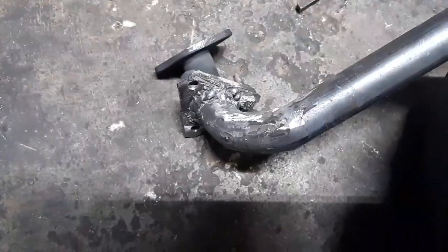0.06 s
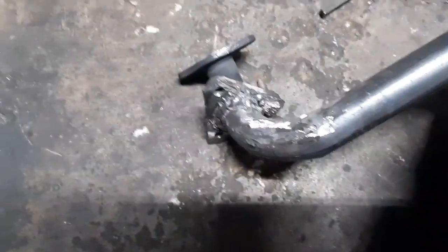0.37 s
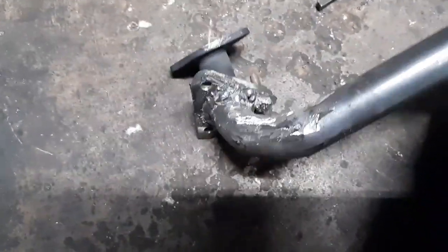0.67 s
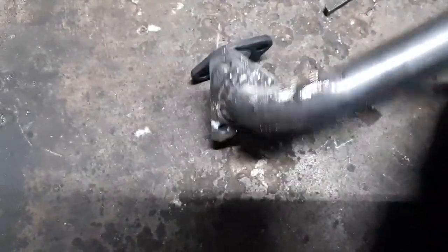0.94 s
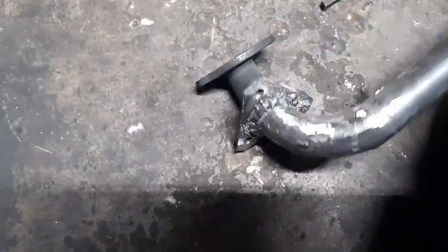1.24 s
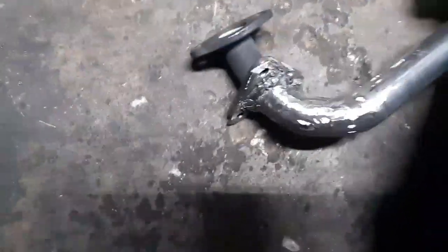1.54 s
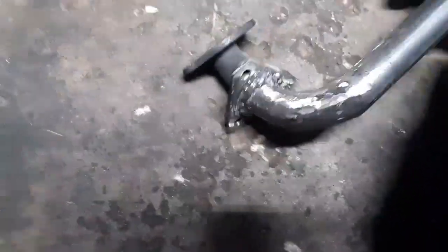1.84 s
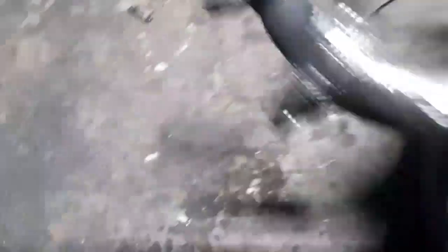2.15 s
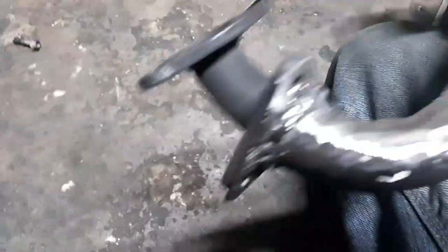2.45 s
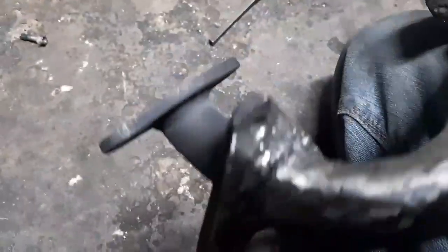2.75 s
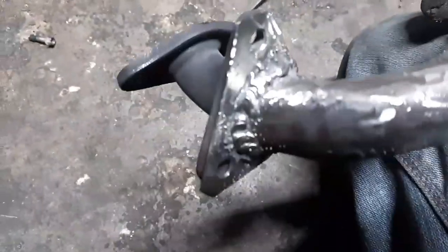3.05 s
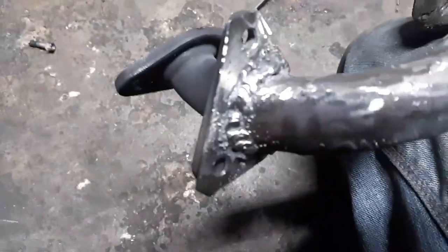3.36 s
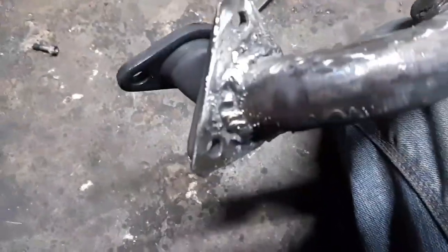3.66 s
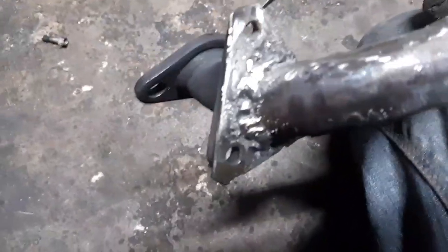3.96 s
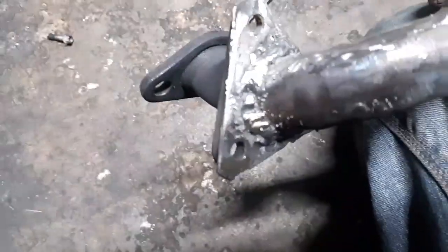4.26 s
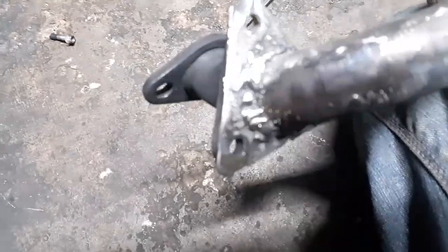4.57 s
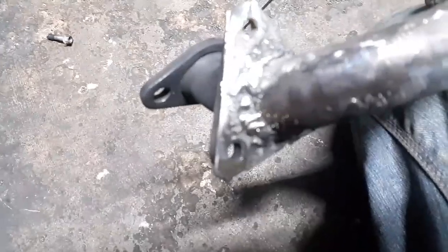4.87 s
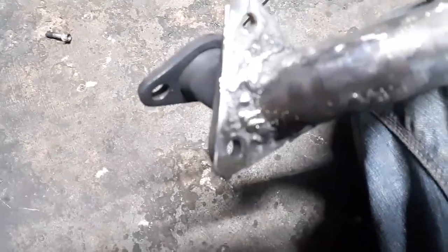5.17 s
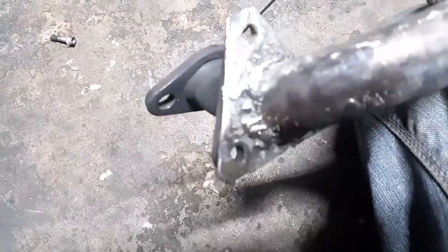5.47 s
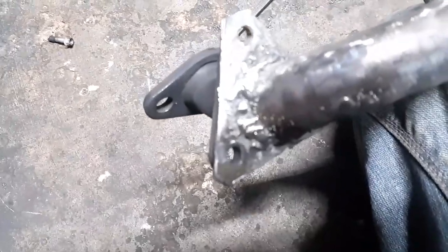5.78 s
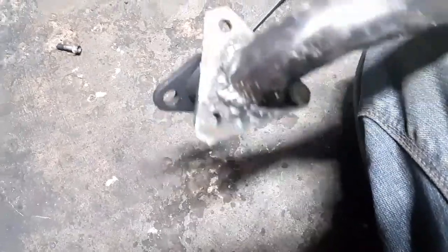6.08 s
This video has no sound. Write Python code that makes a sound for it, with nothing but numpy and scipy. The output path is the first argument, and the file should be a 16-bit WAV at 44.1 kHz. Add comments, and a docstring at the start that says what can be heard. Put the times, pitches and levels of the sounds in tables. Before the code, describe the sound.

A steel exhaust pipe is turned over on a concrete garage floor, close to a small microphone. It taps lightly, then gives a sharp ringing clank, a second clank and a brief squealing skid with a dull thud. Soft rubbing and one more clink follow as it is lifted. A low fan-like hum with thin hiss runs underneath and carries on afterwards, broken by one tiny tick.

```python
"""A fan-like hum and thin hiss fill a garage. Close to a small microphone, a welded steel exhaust pipe is
turned over on the concrete floor: its flanges tap, clank, skid briefly and clink once more as it is lifted.
Every contact rings the same modes, favouring two of them; a skid adds a squeal. The pipe rubs softly as it
shifts, a faint high haze follows the last clink, one tiny tick comes later, and the walls answer faintly."""
import sys
import numpy as np
from scipy import signal
from scipy.fft import rfft, irfft, next_fast_len
from scipy.io import wavfile
from scipy.ndimage import map_coordinates

SR = 44100
rng = np.random.default_rng(int(sys.argv[2]) if len(sys.argv) > 2 else 0)


def persist_wave(psi):
    """Save psi, clipped to +-1, as 16-bit WAV."""
    counts = np.round(np.clip(psi, -1, 1) * 32767).astype(np.int16)
    wavfile.write(sys.argv[1], SR, np.atleast_2d(counts).T)


N = 269878


def amp(db):
    """Decibels to gain."""
    return 10 ** (np.asarray(db) / 20)


def unit(x):
    """x at rms 1."""
    return x / np.sqrt(np.mean(x ** 2) + 1e-20)


def along(points, hz):
    """(frequency, value) points read on a log axis."""
    freqs, values = np.transpose(points)
    return np.interp(np.log(hz + 1), np.log(freqs + 1), values)


def wobble(rate, size=N):
    """A smooth random curve, rate knots a second."""
    knots = rng.standard_normal(int(size * rate / SR) + 4)
    return map_coordinates(knots, [np.arange(size) * rate / SR])


def filtered(x, response):
    """x shaped by a gain that depends on frequency."""
    size = next_fast_len(len(x) + 8192)
    return irfft(rfft(x, size) * response(np.fft.rfftfreq(size, 1 / SR)), size)[:len(x)]


def noise(colour):
    """Noise of rms 1 with a (frequency [Hz], level [dB]) spectrum."""
    return unit(filtered(rng.standard_normal(N), lambda hz: amp(along(colour, hz))))


def dying(x, t60s, hold_s=0):
    """x dies away after hold_s, each frequency at its own speed."""
    hz, t, spectrum = signal.stft(x, SR, nperseg=256)
    fade = amp(-60 * np.maximum(t - hold_s, 0) / along(t60s, hz)[:, None])
    return signal.istft(spectrum * fade, SR, nperseg=256)[1][:len(x)]


def add(track, start_s, sound):
    """Mix a sound into the track."""
    part = track[round(start_s * SR):][:len(sound)]
    part += sound[:len(part)]


# rise and fall of the room tone: (time [s], level [dB])
ROOM_TONE_LEVEL = [(0, -58), (0.32, -58.5), (0.52, -52.5), (1.42, -52), (1.75, -61), (2.05, -67.5),
                   (2.28, -66.5), (2.39, -57.5), (2.6, -53.5), (6.12, -53)]
# tones in the hum: (frequency [Hz], relative level [dB])
HUM_TONES = [(122, -21), (163, -16.5), (204, -16.5), (247, -10), (362, -15.5), (1102, -18.5)]
# spectra of the low hum, the moving air and the hiss: (frequency [Hz], relative level [dB])
HUM_SPECTRUM = [(20, -26), (40, -20.5), (65, -15), (100, -10.5), (160, -2), (240, -2), (300, -7), (430, -6),
                (500, -21), (620, -25.5), (900, -60.5)]
AIRFLOW_SPECTRUM = [(350, -40.5), (560, -14.5), (700, -6), (880, 2.5), (1030, -3), (1150, -4.5),
                    (1280, -11.5), (1490, -4), (1700, -18.5), (1950, -24.5), (2130, -15.5), (2320, -23.5),
                    (2500, -11), (2850, -17), (3150, -28), (4500, -61.5)]
HISS_SPECTRUM = [(400, -27), (1500, -2.5), (3200, -7), (4300, -3.5), (4950, -1.5), (5600, 0), (6850, -5),
                 (7200, -14.5), (9500, -14), (12000, -10.5), (16000, -12.5)]


def room_tone(hum_db=-2.5, airflow_db=-12, hiss_db=-24, hiss_follow=0.79, dulling=0.72, drift_rad=0.3434):
    """All around the microphone: hum, wavering tones, airflow and hiss, sinking after the clanks a while."""
    t = np.arange(N) / SR
    level_db = np.interp(t, *np.transpose(ROOM_TONE_LEVEL))
    usual_db = np.median(level_db)
    change_db = level_db - usual_db
    tones = sum(amp(db) * np.sqrt(2) * np.sin(2 * np.pi * hz * t + drift_rad * wobble(11))
                for hz, db in HUM_TONES)
    # the airflow grows duller as it sinks
    airflow = noise(AIRFLOW_SPECTRUM)
    dull = filtered(airflow, lambda hz: 1 / (1 + (hz / 1800) ** 12))
    airflow = dull + amp(dulling * change_db) * (airflow - dull)
    hum = amp(hum_db) * noise(HUM_SPECTRUM) + amp(airflow_db) * airflow + tones
    # the hiss sinks less than the hum
    hiss = amp(hiss_db + usual_db + hiss_follow * change_db) * noise(HISS_SPECTRUM)
    return amp(level_db - 2) * hum + hiss


# reverberation of the garage: (frequency [Hz], t60 [s])
GARAGE_DECAY = [(150, .28), (1000, 0.35), (6000, 0.26), (14000, 0.05)]


def garage(x):
    """The short diffuse answer of the walls, reaching the microphone 10 ms after the direct sound."""
    tail = np.pad(dying(rng.standard_normal(SR // 2), GARAGE_DECAY), (SR // 100, 0))
    return signal.fftconvolve(x, tail / np.linalg.norm(tail))[:N]


# one small dry tick: (time [s], level [dB], t60 [s])
TICK_EVENT = (4.2003, -49.5, 0.015)
# its spectrum: (frequency [Hz], relative level [dB])
TICK_SPECTRUM = [(600, -17), (1700, -2), (4000, 1), (6000, 2), (7500, -15), (10500, -17), (15000, -29)]


def tick(tail_db=-15, tail_t60=0.16):
    """A tiny click close by while the pipe is held still, scattered briefly by nearby surfaces."""
    start_s, db, t60 = TICK_EVENT
    t = np.arange(N) / SR - start_s
    fade = amp(-60 * np.abs(t) / t60) + amp(tail_db - 60 * np.abs(t) / tail_t60)
    return (t > 0) * amp(db) * fade * noise(TICK_SPECTRUM)


# soft rubs and, at 1.983 s, a faint, brief high haze just after the last clink:
# (middle time [s], half length [s], level [dB])
SWISHES = [(0.4, 0.076, -77.5), (0.508, 0.036, -66.5), (0.71, 0.035, -66.5), (1.217, 0.084, -66.5),
           (1.24, 0.02, -60), (1.439, 0.085, -54), (1.71, 0.011, -64), (1.779, 0.059, -64),
           (1.983, 0.04, -71), (5.974, 0.031, -71.5), (6.04, .035, -72.5)]
# their spectrum: (frequency [Hz], relative level [dB])
SWISH_SPECTRUM = [(200, -29.5), (700, 5), (1800, -7), (4000, -2), (6400, -2.5), (7800, -10), (12000, -8.5),
                  (16000, -7)]


def swishes(grain_db=1.5, sing_db=-7, note_hz=6465, second_hz=6170, slip_s=0.001):
    """Short grainy swishes close by, mostly the pipe rubbing as it shifts; the steel sings faintly along."""
    t = np.arange(N) / SR
    swell = sum(amp(db) * np.exp(-((t - middle_s) / half_s) ** 2) for middle_s, half_s, db in SWISHES)
    swish = swell * unit(noise(SWISH_SPECTRUM) * amp(grain_db * wobble(500)))
    # the hand that rubs also damps the ring
    steel = ring(t[:SR // 4], note_hz, second_hz, slip_s, damping=4)
    singing = signal.fftconvolve(swish, steel / np.linalg.norm(steel))[:N]
    return swish + amp(sing_db) * singing


def squeal(hz, skid_s, centre_hz=8460, width_octaves=0.48, build_s=0.0014):
    """A skid drives one treble band, harder the longer it lasts: 0-1 at each frequency."""
    band = np.exp(-(np.log2((hz + 1) / centre_hz) / width_octaves) ** 2)
    return (1 - np.exp(-skid_s / build_s)) * band


def thud(t, low_burst, thud_db, t60=0.07, deepest_hz=44.7, lightest_hz=260, db_per_octave=8.5):
    """The low part of an impact on the floor: a heavier blow reaches deeper into the bass."""
    cutoff_hz = min(deepest_hz * 2 ** (-thud_db / db_per_octave), lightest_hz)
    return filtered(low_burst, lambda hz: hz ** 2 / (hz ** 2 + cutoff_hz ** 2)) * amp(-60 * t / t60)


# spectrum common to all clacks: (frequency [Hz], relative level [dB])
CLACK_SPECTRUM = [(30, -21.5), (70, -8.5), (125, 6), (185, 2), (290, -5), (400, 2), (540, -4.5), (900, 1.5),
                  (1550, -1), (1900, -5), (2500, 0), (3200, 1.5), (3800, 7), (5100, -6.5), (6100, 1),
                  (7700, -17), (9000, -12), (12500, -2), (15500, -3.5)]
# decay of a clack: (frequency [Hz], t60 [s])
CLACK_DECAY = [(150, 0.056), (1000, 0.064), (4000, 0.082), (7000, 0.066), (14000, .08)]


def clack(t, skid_s, hold_s, clack_db, tilt_db, thud_db, squeal_db=12.5, grit_db=3.5, ripple_db=6,
          thud_hz=200, bright_hz=1100, pivot_hz=3200):
    """Steel on concrete: a dense, gritty, quickly dying burst, brighter from a sharp edge, over a thud."""
    def response(hz):
        octaves = np.log2(np.maximum(hz, bright_hz) / pivot_hz)
        bright_db = clack_db + tilt_db * octaves + squeal_db * squeal(hz, skid_s)
        thud_share = along([(thud_hz, 1), (bright_hz, 0)], hz)
        colour_db = along(CLACK_SPECTRUM, hz) + thud_share * thud_db + (1 - thud_share) * bright_db
        # countless short-lived resonances, some 130 Hz apart, ripple the spectrum
        ripple = map_coordinates(rng.standard_normal(SR // 260 + 4), [hz / 130])
        return amp(colour_db + ripple_db * ripple * np.minimum(hz / 2000, 1))

    burst = filtered(rng.standard_normal(len(t)), response)
    low = filtered(burst, lambda hz: 1 / (1 + (hz / 500) ** 4))
    grit = amp(grit_db * wobble(700, size=len(t)))
    # only the first impact thuds; the skid sustains the bright part alone
    return dying(burst - low, CLACK_DECAY, hold_s) * grit + thud(t, low, thud_db)


# modes of the steel pipe: (frequency [Hz], relative level [dB], t60 before damping and late fade [s])
PIPE_MODES = [(858, -11, .12), (1029.6, -14, .16), (1420, -15, .14), (1630, -15, .14), (2273, -18.5, 0.11),
              (2694, -17.5, 0.15), (3100, -21, 0.099), (3597, -11, 0.12), (3780, -16, 0.075),
              (4573, -18, .15), (4684, -25, .36), (5780, -16.5, 0.24), (5943, -17.5, 0.27),
              (6170, -19.5, .14), (6465, -21.5, 0.16), (6656, -19, 0.15), (6703, -30.5, .17),
              (6962, -21.5, .21), (7226, -34, 0.26), (7487, -33.5, .18), (7938, -31.5, .14),
              (8130, -32, 0.099), (9099, -38.5, .15), (10214, -27, .1), (10830, -29.5, .21),
              (11450, -24, 0.12), (12006, -19.5, 0.13), (12134, -24, .14), (12600, -21.5, .1),
              (13400, -23.5, .07)]


def ring(t, note_hz, second_hz, skid_s, damping, hold_s=0, note_db=17, second_db=13, squeal_db=33,
         waver_rad=0.24, twin_db=-9, split_hz=38, late_fade_s=0.0546):
    """The pipe's modes hold while the flange is down, then fade; the loose contact makes them waver."""
    mode_hz, mode_db, mode_t60 = np.transpose(PIPE_MODES)
    # the point that touches favours two modes, and a skid lifts those in its band
    nearest = lambda hz: np.arange(len(mode_hz)) == np.argmin(np.abs(mode_hz - hz))
    driven_db = mode_db + note_db * nearest(note_hz) + second_db * nearest(second_hz)
    driven_db += squeal_db * squeal(mode_hz, skid_s)
    out = np.zeros(len(t))
    free_s = np.maximum(t - hold_s, 0)
    for hz, db, t60 in zip(mode_hz, driven_db, mode_t60):
        phase = 2 * np.pi * (hz * t + rng.random()) + waver_rad * wobble(220, size=len(t))
        # the tube is not quite round: each mode beats against a weaker twin
        twin = phase + 2 * np.pi * (split_hz * rng.standard_normal() * t + rng.random())
        out += amp(db - 60 * damping * free_s / t60) * (np.sin(phase) + amp(twin_db) * np.sin(twin))
    # the late ring fades faster and faster
    return out * amp(-(free_s / late_fade_s) ** 2)


# flanges meeting the floor: (time [s], skid length [s], damping by floor and grip [x decay speed],
# ring gain [dB], main note [Hz], second note [Hz], clack gain [dB], clack tilt [dB/octave], thud gain [dB])
FLOOR_CONTACTS = [(0.716, 0.00023, 2.1, -28.5, 4573, 5780, -28.5, -2.5, -26),
                  (0.730, 0.00017, 1.5, -40, 6465, 2694, -38.5, -2.5, -28),
                  (0.942, 0.0011, 1, -54, 4573, 10830, -54, -7.5, -34.5),
                  (0.962, 0.00054, 0.77, -54, 6465, 11450, -56, -8.5, -31),
                  (0.993, 0.0001, 1.4, -55.5, 6465, 11450, -59.5, -9.5, -23),
                  (1.03, 0.00091, 1.7, -62, 10830, 11450, -74, 4, -57),
                  (1.3407, 0.000066, 1.37, -18, 6170, 12134, -17.5, 1, -13.5),
                  (1.47, 0, 1.29, -21.5, 3597, 5943, -26.5, -4.5, -39.5),
                  (1.524, .018, 1.7, -33.5, 6656, 9099, -26.5, 0.04, -2.5),
                  (1.555, 0.0072, 2.3, -29.5, 6170, 7226, -28, 0.2, -29),
                  (1.767, 0.011, 1.4, -80, 6656, 7938, -62, -6, -33),
                  (1.8934, 0.00041, 0.97, -38.5, 4684, 6962, -36, -3.5, -54)]


def pipe(ring_rise_s=0.0022, clack_rise_s=0.0011, dwell_s=0.0015):
    """On the floor near the microphone: every contact clacks; the ring builds up a little more slowly."""
    out, t = np.zeros(N), np.arange(SR // 2) / SR
    onset = lambda rise_s: 1 - np.exp(-t / (rise_s + 1 / SR))
    for start_s, skid_s, damping, ring_db, note_hz, second_hz, clack_db, tilt_db, thud_db in FLOOR_CONTACTS:
        hold_s = dwell_s + skid_s  # even without a skid the flange stays down a moment
        steel = ring(t, note_hz, second_hz, skid_s, damping, hold_s)
        impact = clack(t, skid_s, hold_s, clack_db, tilt_db, thud_db)
        add(out, start_s, amp(ring_db) * onset(ring_rise_s) * steel + onset(clack_rise_s) * impact)
    return out


def scene(walls_db=-22):
    """One listening spot: the pipe close by, the garage around it."""
    near = pipe() + swishes() + tick()
    return (near + amp(walls_db) * garage(near) + room_tone())[None]


def record(dry, low_hz=45, top_hz=15800):
    """A small mono microphone: thin in the deep bass, nothing above its band limit."""
    thin = signal.sosfilt(signal.butter(2, low_hz, "highpass", fs=SR, output="sos"), dry)
    return np.array([filtered(x, lambda hz: 1 / (1 + (hz / top_hz) ** 200)) for x in thin])


dry = scene()
out = record(dry)
persist_wave(out)
```